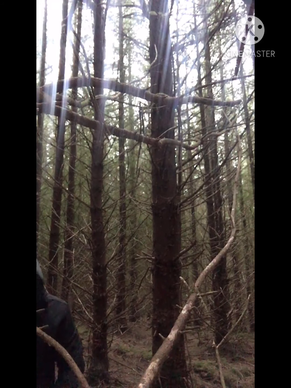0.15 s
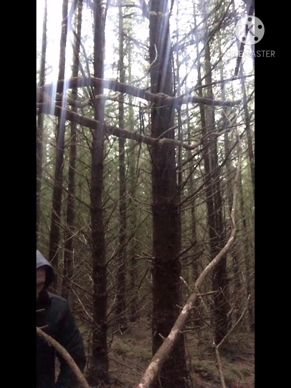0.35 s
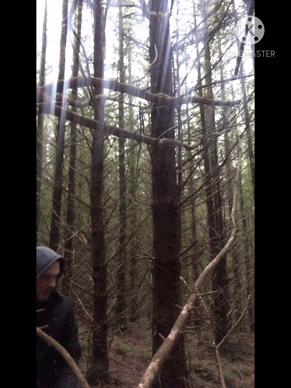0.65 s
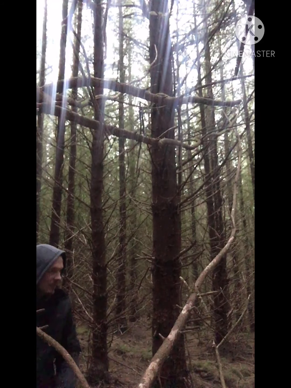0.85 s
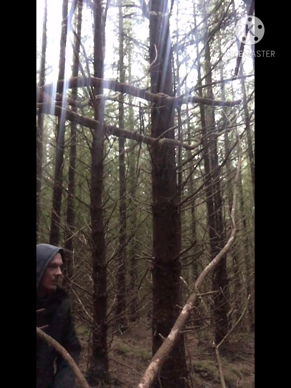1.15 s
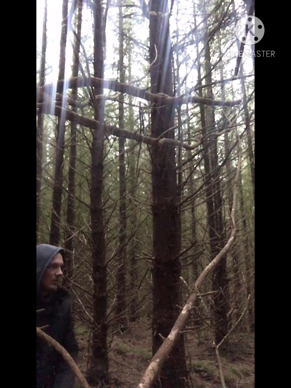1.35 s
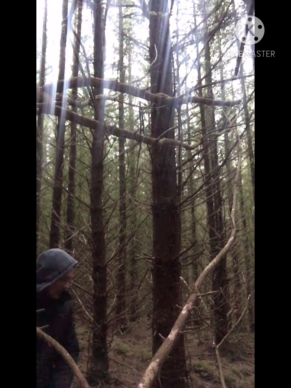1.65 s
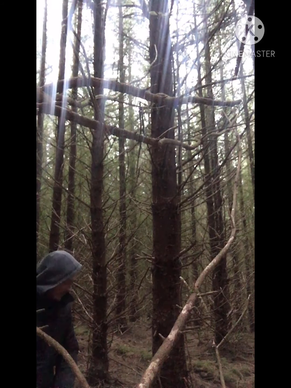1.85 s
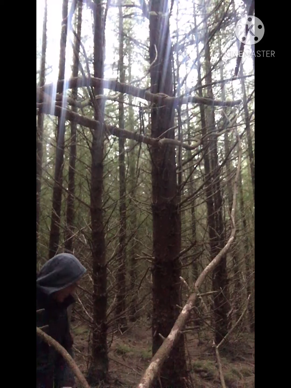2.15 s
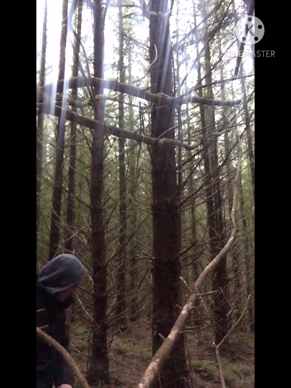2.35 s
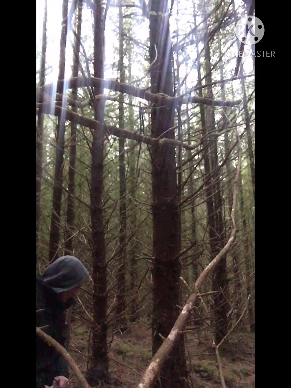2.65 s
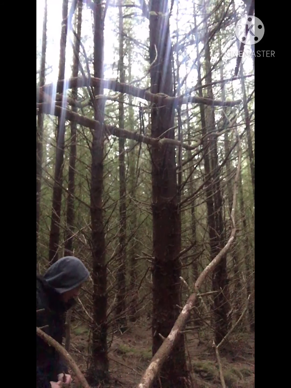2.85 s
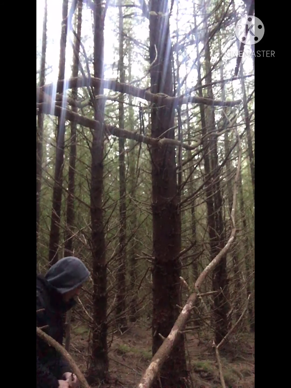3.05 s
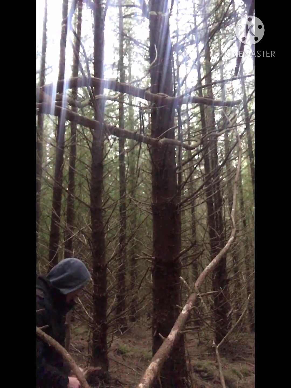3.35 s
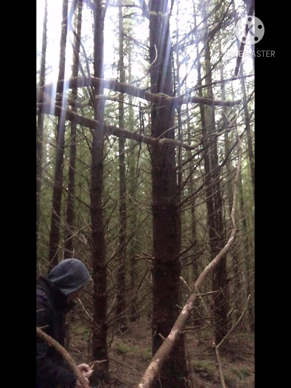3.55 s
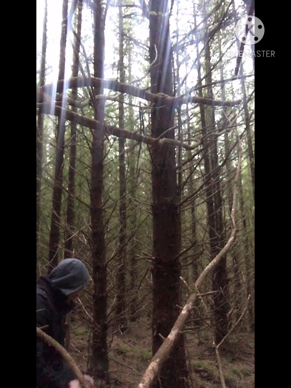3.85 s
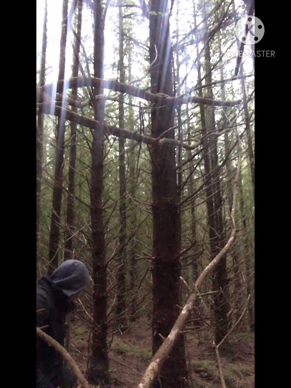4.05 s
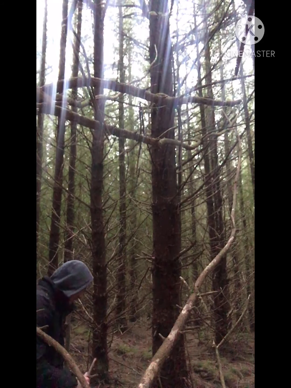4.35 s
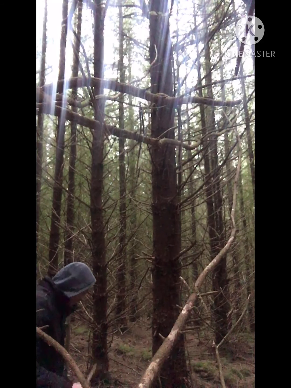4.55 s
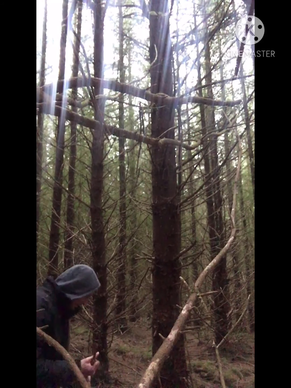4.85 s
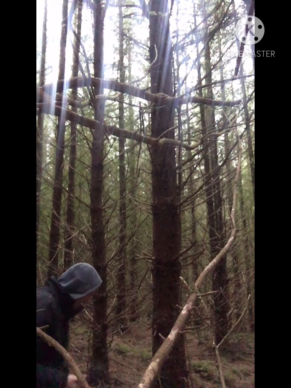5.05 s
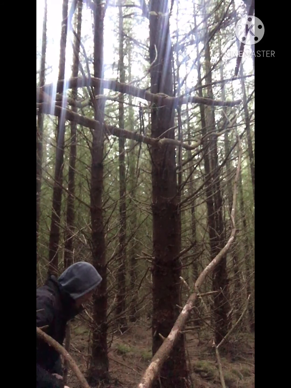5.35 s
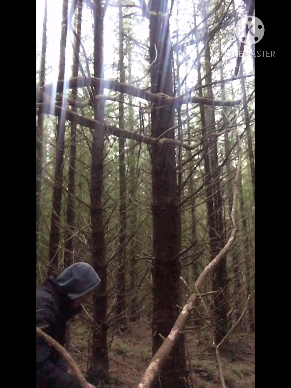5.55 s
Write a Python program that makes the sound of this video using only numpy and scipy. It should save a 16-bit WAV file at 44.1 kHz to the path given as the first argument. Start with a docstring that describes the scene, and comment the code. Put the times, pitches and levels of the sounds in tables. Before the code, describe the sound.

Dry twigs snap sharply by hand in a conifer wood, with sleeve swishes, soft scuffs and faint treetop air between cracks.

```python
"""Dead twigs snapped in a dense conifer wood

A person in a padded jacket breaks dry twigs by hand, one step from a phone's microphone.
Each break is a sharp release and a burst of tearing fibres that rings the twig; ground and trunks scatter it.
Sleeves swish as cloth noise and the weave's tone; shoes scuff the needle litter and something squeaks once,
both as filtered grains. Soft treetop air and a low distant rumble, both shaped noise, lie under it all."""
import sys
import numpy as np
from scipy import signal
from scipy.fft import rfft, irfft
from scipy.io import wavfile
from scipy.ndimage import uniform_filter1d

SR = 44100
rng = np.random.default_rng(int(sys.argv[2]) if len(sys.argv) > 2 else 0)


def transcribe(signal):
    """Save signal, clipped to [-1, 1], as a 16-bit WAV file at the path in sys.argv[1]."""
    frames = np.atleast_2d(signal).T
    limited = np.clip(frames, -1, 1)
    pcm = np.round(limited * 32767).astype(np.int16)
    wavfile.write(sys.argv[1], SR, pcm)


N = 251811
T = np.arange(N) / SR  # s
SIZE = 4096  # samples in a stick's ring, and knots in a random walk
TOP_HZ = 16000  # next to nothing sounds above this

# air in the treetops, spectrum: (frequency [Hz], level [dB])
TREETOP_SPECTRUM = [(59, -39.5), (100, -12), (140, -6), (260, -2.5), (328, -2.5), (358, -4), (547, -9),
                    (801, -16), (1080, -13.5), (1390, -18), (1680, -17), (3470, -32), (3780, -32),
                    (4870, -37.5), (16000, -54.5)]
# far rumble, spectrum: (frequency [Hz], level [dB])
RUMBLE_SPECTRUM = [(20, -30.5), (32, -16), (42, -2), (54, 2.5), (68, -2), (85, -9.5), (120, -22.5),
                   (200, -50.5)]
TREETOP_DB, RUMBLE_DB = -58, -55

# sleeve strokes: (time of fastest motion [s], level before the swish trim [dB], rise [s], fall [s])
SLEEVE_STROKES = [ (0.5, -70, .06, .09), (0.75, -73, 0.042, .04), (0.949, -64.5, .06, 0.14),
                  (1.21, -71, 0.062, .03), (1.56, -65, 0.23, .04), (1.71, -62.5, 0.057, 0.035),
                  (2.03, -66.5, 0.047, 0.12), (3.47, -58.5, 0.098, 0.068), (3.84, -56.5, 0.023, 0.06),
                  (4.0, -72, 0.0793, .06), (4.19, -59.5, 0.054, 0.067), (4.349, -68, 0.032, .1),
                  (4.66, -68, 0.081, .05), (4.82, -64, 0.081, .03), (5.14, -56, 0.098, 0.056), ]
# cloth hiss, spectrum: (frequency [Hz], level [dB])
CLOTH_SPECTRUM = [(250, -10), (600, 11), (1200, 5.5), (2000, 3), (3200, -0.5), (4200, 0.5), (4900, -4),
                  (6200, -1.5), (8200, -6.5), (9600, -5), (12000, -7.5), (16000, -13.5)]
STROKE_SHAPE = 1.7  # 1 = pointed, 2 = bell
RESTING_DB = -78  # the cloth is never quite still; before the swish trim

# resonances of each kind of wood, by name: (frequency [Hz], width before any blur [Hz], level [dB])
WOOD_MODES = { "brittle": [(567, 92, -4.5), (1140, 130, -12), (1703, 78, -12), (2350, 130, -8),
              (3547, 168.7, 4.5), (4404, 450, -6.5), (6240, 1100, -7), (8950, 440, -1), (9680, 350, 0.5),
              (11100, 800, -9.5), (14630, 2610, -13.5)], "thin": [(2510, 120, -11), (4470, 350, -3),
              (5600, 160, 1), (6630, 660, -9.5), (9700, 760, -4), (13000, 1500, -10)],
              "springy": [(550, 400, -25), (1486, 300, -25.5), (3140, 330, -14.5), (4020, 220, -8),
              (6300, 700, -5.5), (9600, 360, -8), (12050, 720, -7.5)], "thick": [(590, 176, 4.5),
              (2560, 180, 2), (4170, 410, 2), (6040, 400, -5.5), (6690, 600, -6), (9200, 1700, -7),
              (10400, 1200, -2)], "stout": [(340, 99, -6.5), (1065, 170, -3), (1550, 330, -6.5),
              (2660, 600, -5), (3900, 910, -10), (5835, 440, 5.5), (7000, 700, -12), (9350, 2200, -5)],
              "branch": [(536, 300, -6), (1113, 450, -20), (2590, 310, -3), (3590, 380, -1),
              (5270, 126, -2), (6300, 480, -8.5), (8530, 400, -5), (9650, 180, -5), (12100, 2200, -22)],
              "splinter": [(3200, 2500, -3.5), (6200, 2200, -2.5), (9350, 3000, -2.5), (14200, 4200, -1.5)],
              "bark": [(1500, 2100, -1), (3100, 1300, 1), (6100, 3900, -9), (10000, 8100, -19.5)],
              "knock": [(635, 82, -4.5), (1165, 110, -1.5), (1870, 140, -13), (6176, 5100, -49)],
              "thud": [(280, 120, -2), (458, 92, 7.5), (590, 97, -7), (1207, 400, -23), (3200, 1500, -24)],
              }

# faint crackles of a twig under strain: (time [s], half length [s], level [dB])
STRAINED_TWIGS = [(0.313, 0.013, -69), (0.95, .008, -61), (1.2, 0.018, -71), (1.72, 0.012, -68),
                  (3.217, 0.09, -68.5), (4.83, 0.016, -70)]

# sticks that break: (time [s], wood [name], level over a millisecond [dB], tearing time [ms],
# time the bark holds [ms], fibres against the main release [dB],
# then against the crack: bark [dB], recoil [dB], echo from the trunks [dB])
BREAKING_STICKS = [ (0.3237, "brittle", -7.5, 1.2, 4.78, 4, -15.5, -27, -23.5),
                   (0.9679, "thin", -27, 1.57, 1.5, 0, -16, -33, -13.5),
                   (0.9766, "thin", -27.5, 0.87, 1.1, -10, -33, -38, -21),
                   (2.5726, "springy", -21, 0.34, 2, 5.5, -11.5, -38.5, -23.5),
                   (2.6097, "thick", -13.5, 1.6, 1.29, 4.5, -19, -17.5, -21.5),
                   (2.63, "thick", -28.5, .74, 1.15, -1, -12, -30.5, -26),
                   (2.7545, "stout", -12.5, 0.5, .6, -5, -11, -16.5, -36),
                   (2.769, "springy", -19.5, 0.32, 2.2, -16.5, -16, -29, -32.5),
                   (5.4142, "branch", -21.5, 3.9, 1.84, 6.5, -17, -10.5, -15.5), ]
# a weaker second crack follows at once, as from the ground
GROUND_S, GROUND_DB, GROUND_MS, GROUND_FIBRE_DB = 0.0036, -10, 0.37, 5
# the bark splits all round the stick, so the trees send much of it back
BARK_MS, BARK_FIBRE_DB, BARK_ECHO_DB = 1.4, 4, -7
# just after the bark the freed halves kick in the hands
RECOIL_S, RECOIL_MS, RECOIL_FIBRE_DB, RECOIL_ECHO_DB = 0.002, 2.1, 8.5, -7

# scuffs on soft ground, and one short rising squeak of a sleeve or zip: (time [s], half length [s],
# centre [Hz], width of each filter pass [Hz], level before the scuff trim [dB], glide [octaves/s])
SCUFFS_AND_SQUEAK = [ (0.405, 0.035, 484, 601, -55.5, -2.5), (1.495, .045, 561, 449, -60, 0),
                     (2.041, 0.021, 570, 690, -56.5, 2), (2.295, .042, 552, 598, -57, -0.5),
                     (3.358, .022, 969, 1297, -52, 2.5), (3.485, 0.021, 1015, 220, -50, -2.5),
                     (3.584, 0.061, 684, 450, -56, -2), (3.601, 0.073, 1488, 1076, -60.5, 0.5),
                     (3.861, 0.025, 676, 300, -57.5, 7), (3.873, 0.021, 1400, 890, -54.5, 6.5),
                     (3.829, 0.0074, 5300, 1000, -59, 15), (4.152, .025, 1900, 900, -60, 4),
                     (4.163, .02, 636, 250, -54, 3.5), (4.21, .03, 950, 593, -55.5, -5.5),
                     (4.77, .02, 605, 201.4, -51.5, -6), (5.123, 0.042, 560, 300.7, -47.5, -1.5),
                     (5.159, .04, 1092, 1016, -56, 2), ]

# light clicks and knocks, of fibres giving way, bark flaking and pieces touching:
# (time [s], wood [name], level over a millisecond [dB], length [ms])
LIGHT_CLICKS = [ (1.159, "splinter", -41.5, 1.8), (1.7280, "bark", -47.5, .6), (1.7356, "bark", -43, 0.73),
                (1.7630, "knock", -34.5, 3.1), (2.4623, "splinter", -47, 0.33),
                (2.5413, "splinter", -36, 0.3), (2.5625, "splinter", -37, 4.7),
                (2.5956, "splinter", -32, .6), (2.6035, "splinter", -34.5, 3.8),
                (2.8772, "splinter", -37, 1.9), (2.8823, "bark", -38, 3.5), (3.003, "splinter", -40.5, 2.4),
                (3.005, "bark", -48.5, 4.1), (3.1302, "splinter", -49, 1), (3.1492, "splinter", -51, 1.2),
                (3.2503, "splinter", -58, .8), (3.2800, "splinter", -53, 0.97),
                (3.2887, "splinter", -49.5, 2.25), (3.316, "splinter", -44, 3.5),
                (3.319, "bark", -40.5, 4.5), (4.3245, "bark", -58, 1.2), (4.591, "bark", -57, 2.2),
                (4.6600, "bark", -58.5, 2.2), (4.6850, "thud", -42.5, .6), (5.425, "bark", -34.5, 4.9),
                (5.4297, "thud", -30, 6.4), (5.4417, "bark", -39, 5), (5.4445, "thud", -28, 0.54),
                (5.5476, "bark", -46.5, 3.1), (5.55, "knock", -49, 1.5), ]
# a longer click catches more fibres; at EVEN_MS they equal the first release in energy
EVEN_MS, FIBRE_DB_PER_OCTAVE, CLICK_ECHO_DB = 1.8, 3, -12


def amp(db):
    """Decibels to gain."""
    return 10 ** (np.asarray(db) / 20)


def unit(x):
    """Scale to an energy of one."""
    return x / np.sqrt(np.sum(x ** 2))


def noise(points):
    """Noise of rms 1 with a spectrum of (Hz, dB) points."""
    hz, db = np.transpose(points)
    f = np.maximum(np.fft.rfftfreq(N, 1 / SR), 1)
    gain = amp(np.interp(np.log(f), np.log(hz), db))
    white = rfft(rng.standard_normal(N))
    return np.sqrt(N) * unit(irfft(white * gain, N))


def walk(rate):
    """Smooth random wandering about zero, through `rate` random knots per second."""
    knots = rng.standard_normal(SIZE)
    return uniform_filter1d(np.interp(T * rate, np.arange(SIZE), knots), SIZE // 16)


def swell(s, half_s):
    """A bell-shaped rise and fall around a time."""
    return np.exp(-((T - s) / half_s) ** 2 / 2)


def grains(rate, spread_db):
    """Tiny catches of uneven size at random times, `rate` per second on average; rms 1."""
    when = rng.random(N)
    size = rng.exponential(size=N)
    sign = rng.choice([-1, 1], N)
    catches = (when < rate / SR) * sign * amp(spread_db * np.minimum(size, 4))
    return np.sqrt(N) * unit(catches)


def add(track, s, sound):
    """Mix a sound into a track at a time."""
    i = int(s * SR)
    track[i:i + len(sound)] += sound[:N - i]


def resonance(f, hz, width):
    """Power response of one damped mode."""
    return (f * width) ** 2 / ((f * width) ** 2 + (f ** 2 - hz ** 2) ** 2)


def ring(modes, spread_ms, blur=1):
    """Causal response of a stick; bending waves carry the treble out ahead of the bass."""
    f = np.fft.rfftfreq(SIZE, 1 / SR)
    power = sum(amp(db) ** 2 * resonance(f, hz, blur * width) for hz, width, db in modes)
    # folding the cepstrum gives minimum phase: the ring starts at once
    cepstrum = irfft(np.log(power + 1e-7) / 2)
    cepstrum[1:SIZE // 2] *= 2
    cepstrum[SIZE // 2 + 1:] = 0
    # added delay: spread_ms at 1 kHz, less above
    lag_cycles = 2 * spread_ms / 1000 * np.sqrt(1000 * f)
    return irfft(np.exp(rfft(cepstrum) - 2j * np.pi * lag_cycles))


def fracture(tear_ms, fibre_db, scatter_db=4, fibre_hz=2200):
    """One main release, then a dying volley of fibres, too fine to make much bass."""
    ms = 1000 * T[:SIZE // 4]
    push, size = rng.standard_normal((2, len(ms)))
    volley = push * amp(scatter_db * size) * np.exp(-ms / tear_ms) * (ms > 0)
    highpass = signal.butter(1, fibre_hz, "high", fs=SR, output="sos")
    force = amp(fibre_db) * unit(signal.sosfilt(highpass, volley))
    force[0] = 1  # the main release
    return force


def scatter(start_s, t60_s, patchy_db):
    """A dying cloud of small uneven echoes, of energy one."""
    t = T[:SR * 3 // 4]
    echo, size = rng.standard_normal((2, len(t)))
    decay = np.exp(-np.log(1000) * t / t60_s)
    return unit(echo * amp(patchy_db * size) * (t > start_s) * decay)


def trunks(split_hz=5000, low_t60_s=0.34, high_t60_s=0.35, high_db=-3):
    """Echoes from the trees: the treble comes back later and is turned down."""
    low, high = (signal.butter(2, split_hz, kind, fs=SR, output="sos") for kind in ("low", "high"))
    dull = signal.sosfilt(low, scatter(start_s=0.0055, t60_s=low_t60_s, patchy_db=3.0))
    bright = signal.sosfilt(high, scatter(start_s=0.015, t60_s=high_t60_s, patchy_db=0.5))
    return dull + amp(high_db) * bright


def struck(wood, db, tear_ms, fibre_db, echo_db, ground_db=-12, near_db=-15, blur=6):
    """A release rings its wood and comes back from the ground, the nearest branches and the trunks."""
    modes = WOOD_MODES[wood]
    force = fracture(tear_ms, fibre_db)
    crack = unit(signal.fftconvolve(force, ring(modes, spread_ms=1.2)))
    direct = amp(ground_db) * scatter(start_s=0.0029, t60_s=0.015, patchy_db=4.5)
    direct[0] = 1
    # the trees hear the stick from every side, which evens out its resonances
    all_round = unit(ring(modes, spread_ms=0, blur=blur))
    branches = amp(near_db) * scatter(start_s=0.0025, t60_s=0.05, patchy_db=4.5)
    echoes = branches + amp(echo_db) * trunks()
    sound = signal.fftconvolve(crack[:SIZE], direct) + signal.fftconvolve(all_round, echoes)
    return amp(db) * sound * np.sqrt(SR / 1000)  # level counted over one millisecond


def forest(sway_db=1.5):
    """Soft, slowly wavering air in the treetops over a steady far rumble."""
    air = noise(TREETOP_SPECTRUM) * amp(TREETOP_DB + sway_db * walk(2.6))
    return air + noise(RUMBLE_SPECTRUM) * amp(RUMBLE_DB)


def stroke(s, rise_s, fall_s):
    """An arm speeds up to its fastest moment and slows again."""
    side_s = np.where(T < s, rise_s, fall_s)
    return np.exp(-np.abs((T - s) / side_s) ** STROKE_SHAPE / 2)


def jacket(swish_db=0.5, crinkle_db=1.5, rib_hz=1400, rib_db=-4, wander=0.3, slip_hz=150, tick_db=-9):
    """Cloth slides on cloth; folds make the hiss uneven and the weave sings higher the faster it moves."""
    power = amp(RESTING_DB) ** 2
    for s, db, rise_s, fall_s in SLEEVE_STROKES:
        power = power + (amp(db) * stroke(s, rise_s, fall_s)) ** 2
    rub = np.sqrt(power) * amp(swish_db + crinkle_db * walk(180))
    speed = uniform_filter1d(np.sqrt(rub / rub.max()), SIZE // 2)
    weave = 0
    for fold in (1, 2):  # a wavering tone and one near its octave
        hz = fold * rib_hz * speed * np.exp(wander * walk(25)) + slip_hz * walk(300)
        weave = weave + walk(120) * np.sin(2 * np.pi * np.cumsum(hz) / SR) / fold
    # flakes of bark catch on the moving sleeve
    flake = unit(ring(WOOD_MODES["bark"], spread_ms=1))
    ticks = signal.fftconvolve(grains(rate=420, spread_db=-0.5), flake)[:N]
    return rub * (noise(CLOTH_SPECTRUM) + amp(rib_db) * weave + amp(tick_db) * ticks)


def crackle(rate=130, spread_db=4.0):
    """Single fibres give way at random while a twig is bent."""
    fibres = grains(rate, spread_db)
    splinter = unit(ring(WOOD_MODES["splinter"], spread_ms=1))
    ringing = signal.fftconvolve(fibres, splinter)[:N]
    return ringing * sum(amp(db) * swell(s, half_s) for s, half_s, db in STRAINED_TWIGS)


def twigs():
    """The wood cracks; within milliseconds come a second crack, the splitting bark and the recoil."""
    out = np.zeros(N)
    for s, wood, db, tear_ms, hold_ms, fibre_db, bark_db, recoil_db, echo_db in BREAKING_STICKS:
        crack = struck(wood, db, tear_ms, fibre_db, echo_db)
        second_crack = struck(wood, db + GROUND_DB, GROUND_MS, GROUND_FIBRE_DB, echo_db)
        bark = struck("bark", db + bark_db, BARK_MS, BARK_FIBRE_DB, BARK_ECHO_DB)
        recoil = struck("thud", db + recoil_db, RECOIL_MS, RECOIL_FIBRE_DB, RECOIL_ECHO_DB)
        split_s = s + hold_ms / 1000
        add(out, s, crack)
        add(out, s + GROUND_S, second_crack)
        add(out, split_s, bark)
        add(out, split_s + RECOIL_S, recoil)
    return out


def scuffs_and_squeak(grain_db=1, scuff_db=-2, wander=0.05):
    """Soles on needle litter, and one squeak of a sleeve or zip: dense little catches with a sliding pitch."""
    out = np.zeros(N)
    catches = grains(rate=3400, spread_db=2.0)
    waver = wander * walk(30)  # octaves
    for s, half_s, hz, width, db, glide in SCUFFS_AND_SQUEAK:
        b, a = signal.iirpeak(hz, hz / width, fs=SR)
        once = signal.lfilter(b, a, catches)
        rub = np.sqrt(N) * unit(signal.lfilter(b, a, once))
        near = np.abs(T - s) < 4 * half_s
        # reading the rub faster or slower bends its pitch
        pace = 2 ** (glide * (T[near] - s) + waver[near])
        bent = np.interp(s + np.cumsum(pace) / SR, T, rub)
        out[near] += amp(db) * bent * swell(s, half_s)[near]
    return out * amp(scuff_db + grain_db * walk(90))


def click(wood, db, length_ms):
    """One light click; the longer it lasts, the rougher it is."""
    fibre_db = FIBRE_DB_PER_OCTAVE * np.log2(length_ms / EVEN_MS)
    return struck(wood, db, length_ms, fibre_db, CLICK_ECHO_DB)


def light_clicks():
    """Fibres give way, bark flakes and pieces touch, each click ringing its wood."""
    out = np.zeros(N)
    for s, wood, db, length_ms in LIGHT_CLICKS:
        add(out, s, click(wood, db, length_ms))
    return out


def scene():
    """All sources at one microphone."""
    wood = twigs() + light_clicks() + crackle()
    return (wood + jacket() + scuffs_and_squeak() + forest())[None]


def record(dry, mic_hz=14000):
    """The microphone softens the highest treble; next to nothing sounds above TOP_HZ."""
    soft = signal.sosfilt(signal.butter(2, mic_hz, fs=SR, output="sos"), dry)
    return signal.sosfilt(signal.ellip(10, 0.2, 70, TOP_HZ, fs=SR, output="sos"), soft)


dry = scene()
out = record(dry)
transcribe(out)
```